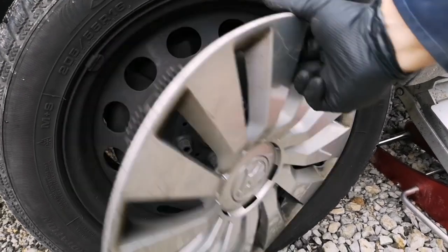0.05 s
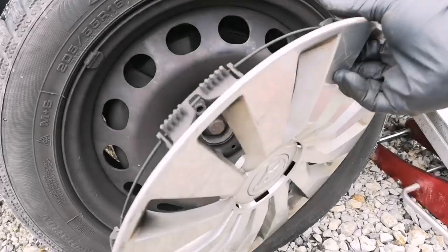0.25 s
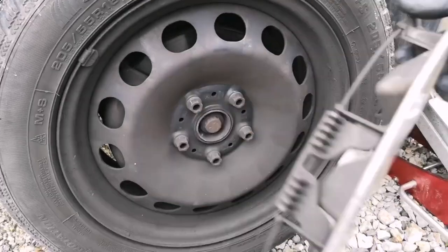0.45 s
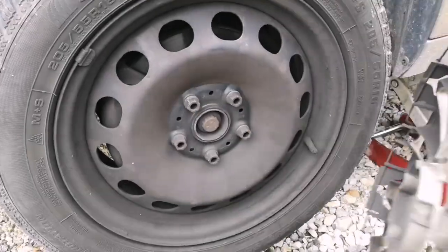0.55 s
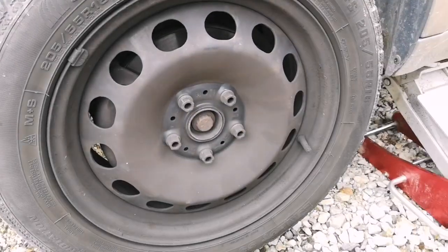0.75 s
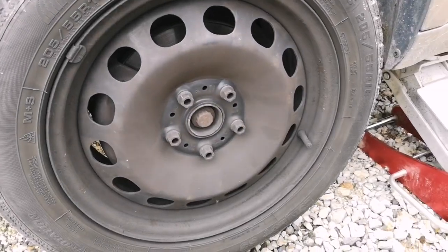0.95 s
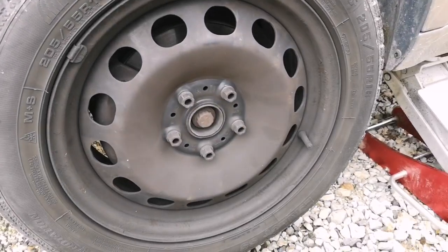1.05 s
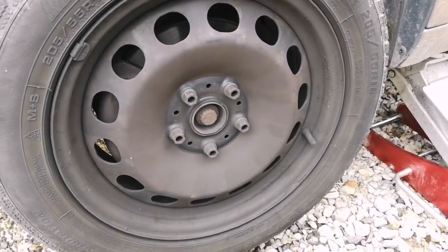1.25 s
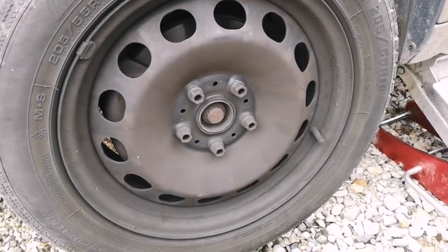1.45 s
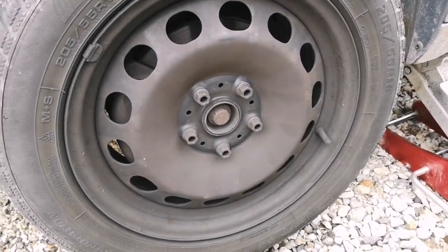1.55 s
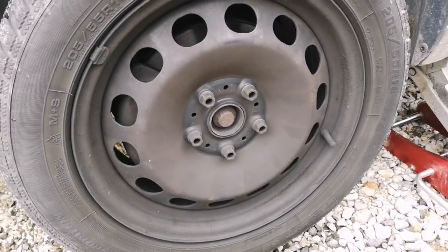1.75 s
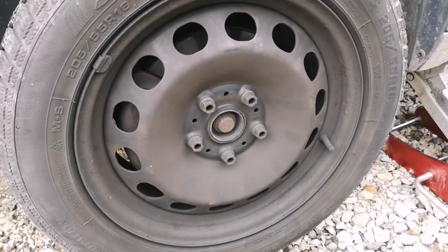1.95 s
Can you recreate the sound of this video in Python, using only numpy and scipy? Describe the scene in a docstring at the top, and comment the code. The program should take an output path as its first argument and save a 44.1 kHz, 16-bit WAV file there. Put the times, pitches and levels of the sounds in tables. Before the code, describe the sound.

A plastic hubcap cracks off a car wheel at about 0.2 seconds, its clips snapping in a quick, close volley. It scrapes and squeaks over the steel rim and rattles until 0.5 seconds, with a last clack near 0.6. Soft handling bumps and faint glove rustle follow, then a few gravel ticks around 1.5 seconds. Small birds chirp faintly in the quiet outdoor air.

```python
"""Hubcap pulled off a wheel

Close by, the clips of a plastic hubcap crack free in a quick volley, then scrape and squeak over the
steel rim. The freed disc wobbles and rattles, with a last clack of its wire ring. Soft handling bumps,
rustling gloves and a few ticks of gravel follow. Small birds call in quiet outdoor air."""
import sys
import numpy as np
from scipy import signal
from scipy.fft import rfft, irfft, next_fast_len
from scipy.io import wavfile
from scipy.ndimage import map_coordinates

SR = 44100
rng = np.random.default_rng(int(sys.argv[2]) if len(sys.argv) > 2 else 0)


def dump(signal):
    """Clip the signal to [-1, 1] and save it as 16-bit WAV at the path in sys.argv[1]."""
    limited = np.clip(np.atleast_2d(signal).T, -1, 1)
    pcm = np.round(limited * 32767).astype(np.int16)
    wavfile.write(sys.argv[1], SR, pcm)


N = 88200

# stereo likeness (frequency [Hz], left-right correlation [-])
COHERENCE = [(100, .99), (450, 0.78), (750, 0.48), (1400, 0.26), (2700, -0.3), (4500, -0.098), (8000, 0.57),
             (13000, 0.73)]
# hubcap balance (frequency [Hz], left-right [dB])
PLASTIC_BALANCE = [(400, 0), (1300, 1), (2700, -10.5), (4500, 10), (7000, -0.5), (9000, -16), (12000, 1)]
# rim squeaks, then one bird note in the last row
# (start [s], length [s], from [Hz], to [Hz], level [dB], left-right [dB])
TONES = [(.1945, 0.0085, 6000, 6050, -32, 10.5), (0.191, 0.0087, 1500, 1393, -29.5, -3),
         (0.3, 0.02, 2600, 2804, -29.5, -14.5), (0.305, 0.0098, 3750, 3984, -29, -2.5),
         (0.3165, 0.011, 2900, 2604, -19, -12), (.329, .009, 2620, 2453, -30, -15.5),
         (.3665, 0.0059, 1316, 1030, -31.5, 0.5), (.368, 0.039, 5140, 5300, -40, -6)]


def amp(db):
    return 10 ** (np.asarray(db) / 20)


def unit_rms(x):
    return x / np.sqrt(np.mean(x ** 2) + 1e-20)


def along(points, hz):
    """Interpolate (frequency [Hz], value) points on a log axis."""
    f, v = np.transpose(points)
    return np.interp(np.log(hz + 1), np.log(f + 1), v)


def since(start_s):
    """Seconds since the start, zero before."""
    return np.maximum(np.arange(N) / SR - start_s, 0)


def fade(t, t60_s, attack_s):
    """Quick rise, exponential decay."""
    return (1 - np.exp(-t / attack_s)) * amp(-60 * t / t60_s)


def arch(start_s, length_s):
    """Half-sine swell."""
    return np.sin(np.pi * np.clip(since(start_s) / length_s, 0, 1))


def pan(side_db):
    """Stereo gains for a left-right difference."""
    return amp(np.array([[.5], [-.5]]) * side_db)


def wobble(rate_hz):
    """Smooth random curve."""
    knots = rng.standard_normal(int(N * rate_hz / SR) + 4)
    return map_coordinates(knots, [np.arange(N) * rate_hz / SR])


def noise(spectrum, balance=((1000, 0),), tilt_db_oct=0):
    """Coloured, partly coherent stereo noise, rms 1."""
    hz = np.fft.rfftfreq(N, 1 / SR)
    angle = np.arccos(np.clip(along(COHERENCE, hz), -1, 1)) / 2
    mid, side = rfft(rng.standard_normal((2, N))) * [np.cos(angle), np.sin(angle)]
    colour = amp(along(spectrum, hz) + tilt_db_oct * np.log2(np.clip(hz, 900, 9000)))
    return unit_rms(irfft(np.array([mid + side, mid - side]) * colour * pan(along(balance, hz)), N))


def glide(start_s, length_s, from_hz, to_hz, jitter):
    """Phase of an unsteady tone sliding ever faster."""
    progress = np.clip(since(start_s) / length_s, 0, 1)
    hz = (from_hz + (to_hz - from_hz) * progress ** 1.5) * (1 + jitter * wobble(700))
    return 2 * np.pi * np.cumsum(hz) / SR


def sliding_tones(rows, overtone_db=-24):
    """Short panned glides, with overtones on the lower ones."""
    stereo_rad = np.array([[0], [2]])
    out = np.zeros((2, N))
    for s, length_s, from_hz, to_hz, db, side_db in rows:
        phase = glide(s, length_s, from_hz, to_hz, jitter=.025) + stereo_rad
        tone = np.sin(phase)
        if from_hz < 4000:
            tone += amp(overtone_db) * (np.sin(2 * phase) + np.sin(3 * phase))
        out += amp(db) * pan(side_db) * np.sqrt(np.abs(arch(s, length_s))) * tone
    return out


def hits(rows, carrier, t60_s, attack_s):
    """Short contacts sharing one noise."""
    return carrier * sum(amp(db) * fade(since(s), t60_s, attack_s) for s, db in rows)


def rubbing(strokes, carrier, rough_db, release_s=.006):
    """Tiny slips crowd together over each stroke, then die away."""
    pressure = sum(amp(db) * np.sqrt(np.abs(arch(s, length_s))) for s, length_s, db in strokes)
    pole = np.exp(-1 / (release_s * SR))
    envelope = signal.lfilter([1 - pole], [1, -pole], pressure)
    return envelope * unit_rms(amp(rough_db * wobble(450))) * carrier


def echo(x, t60_s):
    """Diffuse, dulled outdoor reflections."""
    t = np.arange(SR) / SR
    tail = signal.lfilter([1], [1, -.4], rng.standard_normal((2, SR))) * fade(t, t60_s, 0.0033)
    return signal.fftconvolve(x, tail / np.linalg.norm(tail[0]), axes=1)[:, :N]


def outdoors():
    """Faint air and high hiss over a rumble that swells with the movement."""
    # spectra (frequency [Hz], level [dB])
    air_spectrum = [(150, -51.5), (250, -9.5), (480, -21), (800, -13.5), (1400, -11), (2100, -5.5),
                    (3900, -10), (7800, -13.5), (10000, -26.5), (14500, -27.5), (15500, -41.5)]
    hiss_spectrum = [(200, -60.5), (4000, -19.5), (6000, -4), (8000, 2.5), (10000, -13), (14500, -15),
                     (15500, -23)]
    rumble_spectrum = [(12, -38), (20, -1), (59, 0.5), (81, -9), (128, -2), (163, -13.5), (192, -16.5),
                       (312, -22), (500, -43), (650, -47.5), (1100, -120)]
    # envelopes (time [s], level [dB])
    air_level = [(0, -62.5), (.17, -70), (.7, -63.5), (.92, -65), (1.3, -64), (1.45, -63), (1.75, -62),
                 (2, -62.5)]
    hiss_level = [(0, -85.5), (1.3, -82.5), (1.43, -61.5), (1.55, -64.5), (1.8, -64), (2, -69)]
    rumble_level = [(0, -41.5), (.08, -58), (.17, -62), (.22, -34.5), (.5, -43.5), (.57, -54), (.92, -56.5),
                    (1.1, -53.5), (1.3, -60.5), (1.5, -55), (2, -58.5)]
    # (frequency [Hz], left-right [dB])
    air_balance = [(500, -4), (2500, -3.5), (6000, 2.5), (12000, -2)]

    def gain(rows):
        return amp(np.interp(since(0), *np.transpose(rows)))

    air = gain(air_level) * noise(air_spectrum, air_balance)
    hiss = gain(hiss_level) * noise(hiss_spectrum)
    rumble = gain(rumble_level) * noise(rumble_spectrum)
    return air + hiss + rumble


def birds(flutter_db=3):
    """Thin, raspy sliding whistles with an outdoor echo."""
    # (start [s], length [s], from [Hz], to [Hz], level [dB])
    notes = [(0, .036, 4680, 3350, -51.5), (0.405, 0.021, 3504, 3610, -43.5),
             (0.427, 0.033, 3457, 3940, -39), (0.968, 0.067, 5530, 4500, -57),
             (1.01, 0.055, 4780, 3444, -49), (1.059, 0.049, 2666, 2043, -62.5),
             (1.075, 0.049, 4100, 2295, -55), (1.527, 0.032, 5770, 5740, -55),
             (1.562, 0.0245, 5590, 5090, -45), (1.596, 0.041, 3608, 3735, -46.5),
             (1.633, 0.0231, 3427, 4185, -43), (1.659, 0.0078, 3080, 2850, -48),
             (1.691, 0.077, 1131, 1040, -63.5), (1.93, 0.047, 3500, 2740, -58)]
    song = np.zeros((2, N))
    for s, length_s, from_hz, to_hz, db in notes:
        song += amp(db) * arch(s, length_s) * np.sin(glide(s, length_s, from_hz, to_hz, jitter=.03))
    song *= amp(flutter_db * wobble(250))
    return song + amp(-2) * echo(song, t60_s=0.45)


def bird_whistle():
    """Thin high bird note opening the call at 0.4 s."""
    return sliding_tones(TONES[-1:])


def knock():
    """One faint hollow contact."""
    # (time [s], level [dB])
    contacts = [(.864, -51.5)]
    # (frequency [Hz], level [dB])
    spectrum = [(400, -42), (750, 5.5), (1000, -6), (1300, -4), (2500, -18), (8000, -41)]
    return hits(contacts, noise(spectrum), t60_s=0.1, attack_s=0.00068)


def gravel():
    """Stones tick underfoot."""
    # (time [s], level [dB])
    ticks = [(1.461, -29.5), (1.472, -33.5), (1.5255, -39.5), (1.586, -34.5)]
    # (frequency [Hz], level [dB])
    spectrum = [(300, -12.5), (1500, -13), (4000, -8), (6500, 7.5), (8500, 5.5), (10500, -11.5),
                (15000, -27.5)]
    return hits(ticks, noise(spectrum), t60_s=0.03, attack_s=0.00127)


def gloves():
    """Gloves and sleeves rub as they move."""
    # (start [s], length [s], level [dB])
    strokes = [(1.04, 0.1233, -62), (1.295, .025, -60.5), (1.37, 0.076, -59.5), (1.58, .14, -59.5)]
    # (frequency [Hz], level [dB])
    spectrum = [(100, -14), (280, 11.5), (550, -12), (800, 2), (1500, -2), (2500, 3), (4500, -3), (8000, 0),
                (10500, -16), (15000, -18)]
    return rubbing(strokes, noise(spectrum), rough_db=3.5)


def hand_bumps(tau_s=0.0037):
    """Soft handling: each bump is one push and a shallow rebound."""
    # (time [s], level [dB])
    bumps = [(0.366, -48), (.423, -34), (.508, -30.5), (0.771, -37), (0.834, -38), (1.052, -32),
             (1.091, -35.5), (1.46, -40.5)]
    out = np.zeros(N)
    for s, db in bumps:
        u = since(s - tau_s / 2) / tau_s
        out += amp(db) * 3 * u * (1 - u / 2) * np.exp(-u)
    return out


def disc_flex():
    """The whole disc wobbles in its lowest modes."""
    # (time [s], frequency [Hz], level [dB], t60 [s])
    flexes = [(0.197, 54.5, -40, 0.16), (.2, 241.2, -25.5, 0.08), (.262, 337.4, -38, 0.17),
              (.266, 135.3, -26, 0.38), (0.357, 126.7, -27, 0.38), (0.458, 142.1, -32.5, 0.32),
              (0.611, 142.4, -47.5, 1.25)]
    return sum(amp(db) * fade(since(s), t60_s, 0.0028) * np.sin(2 * np.pi * hz * since(s))
               for s, hz, db, t60_s in flexes)


def wire_clack():
    """The wire ring slaps the disc."""
    # (time [s], level [dB])
    slaps = [(.5765, -44.5), (.587, -25.5), (.5917, -25.5)]
    # (frequency [Hz], level [dB])
    spectrum = [(120, -42), (200, -33), (974, -20), (1910, -1), (2050, -10), (3060, -1), (3880, -12),
                (4830, -1.5), (7340, 0), (12900, -31), (14600, -30.5), (15500, -56)]
    # (frequency [Hz], left-right [dB])
    balance = [(1200, 1.5), (2700, -8), (4500, 9), (8000, -5.5)]
    return hits(slaps, noise(spectrum, balance), t60_s=0.056, attack_s=0.00046)


def rim_scrapes():
    """Clips drag over the rim."""
    # (start [s], length [s], level [dB])
    strokes = [(.196, 0.034, -30.5), (.262, 0.05, -36.5), (.303, 0.025, -31), (.368, 0.029, -42.5),
               (.426, 0.051, -38)]
    # (frequency [Hz], level [dB])
    spectrum = [(180, -48.5), (300, -7.5), (484, -21), (1670, -12), (1840, 8), (2170, -11), (2600, 5.5),
                (5040, -8.5), (7610, -9), (15500, -32)]
    return rubbing(strokes, noise(spectrum, PLASTIC_BALANCE), rough_db=1.5)


def rim_squeaks():
    """Stick-slip of plastic on steel locks into short, rough tones."""
    return sliding_tones(TONES[:-1])


def disc_ring(t):
    """Disc modes after one snap, random in phase and strength."""
    # (frequency [Hz], level [dB], t60 [s])
    modes = [(235.7, -12.5, 0.084), (339, -10, 0.24), (610, -9, 0.14), (980, -9, 0.15), (1127, -9, 0.16),
             (1322, -7, 0.09), (1592, -17, 0.15), (1890, 3, 0.17), (2720, -8.5, 0.26), (2730, -12, .18),
             (5560, -26, 0.077), (6800, -7, .07)]
    out = np.zeros((2, len(t)))
    for hz, db, t60_s in modes:
        spread_rad = np.arccos(np.clip(along(COHERENCE, hz), -1, 1))
        stereo_rad = np.array([[.5], [-.5]]) * spread_rad * rng.normal()
        tone = np.sin(2 * np.pi * (hz * t + rng.random()) + stereo_rad)
        gain = amp(db + rng.normal(0, 2.25)) * pan(along(PLASTIC_BALANCE, hz))
        out += gain * fade(t, t60_s, 0.0015) * tone
    return out


def clip_snaps(grain_db=2.5, tail_db=-16, ring_db=-18):
    """Each clip cracks, leaves a dense tail in the wheel's dish and rings the disc."""
    # releases and rattles (time [s], level [dB], tilt [dB/octave], left-right [dB])
    snaps = [(0.1951, -26.5, -1, 5), (0.207, -29.5, -0.5, 10), (0.2138, -29, -4, 17),
             (0.222, -14.5, -7.5, -2.5), (0.2259, -10.5, -1.5, 1), (.229, -14, -4.5, 1),
             (0.2377, -17.5, -1, -7.5), (.2415, -24, -3.5, -5), (0.251, -22.5, -1.5, 1),
             (0.2632, -33, -17, 6), (0.271, -36.5, 2, -1.5), (.285, -37, -1.5, 4.5),
             (0.3676, -43.5, 2.5, 10), (0.385, -39, -2.5, -6.5), (0.39, -42, 1, 13),
             (0.4267, -30.5, -4, -1), (0.4883, -35, -0.5, 1)]
    # (frequency [Hz], level [dB])
    spectrum = [(90, -38.5), (170, -10), (330, -9), (430, -26), (620, -9), (1100, -0.5), (1550, 1.5),
                (2000, -3), (2700, 0.5), (4200, -9), (7200, -1.5), (9300, -13.5), (10800, -30),
                (14500, -42.5), (15500, -56)]
    out = np.zeros((2, N))
    for s, db, tilt_db_oct, side_db in snaps:
        t = since(s)
        carrier = noise(spectrum, PLASTIC_BALANCE, tilt_db_oct)
        crack = fade(t, t60_s=0.037, attack_s=.00015) * amp(grain_db * wobble(1000))
        tail = amp(tail_db) * fade(t, t60_s=0.24, attack_s=0.0048)
        snap = carrier * (crack + tail)
        ringing = slice(int(s * SR), int(s * SR) + SR // 3)
        snap[:, ringing] += amp(ring_db) * disc_ring(t[ringing])
        out += amp(db) * pan(side_db) * snap
    return out


def scene():
    """Hubcap and small sounds in a faint yard echo, birds and air behind."""
    direct = rim_scrapes() + gloves() + wire_clack() + gravel() + knock()
    direct += clip_snaps() + rim_squeaks() + bird_whistle()
    yard = amp(-26.5) * echo(direct, t60_s=0.585)
    return direct + yard + disc_flex() + hand_bumps() + birds() + outdoors()


def record(dry):
    """Brick-wall low-pass."""
    cutoff_hz = 15500
    size = next_fast_len(N + SR // 4)
    passband = np.fft.rfftfreq(size, 1 / SR) < cutoff_hz
    return irfft(rfft(dry, size) * passband, size)[:, :N]


dry = scene()
out = record(dry)
dump(out)
```